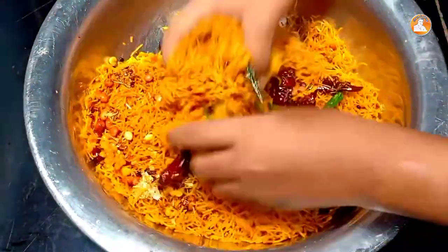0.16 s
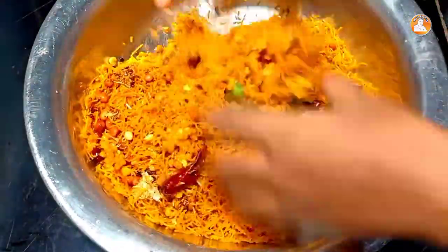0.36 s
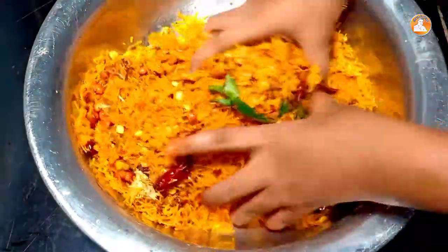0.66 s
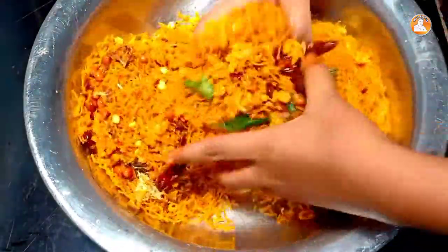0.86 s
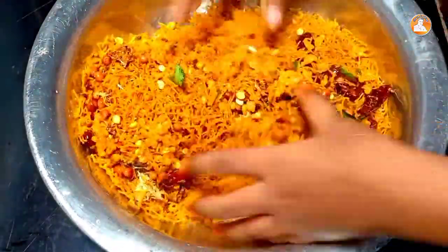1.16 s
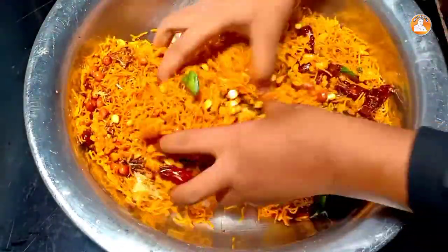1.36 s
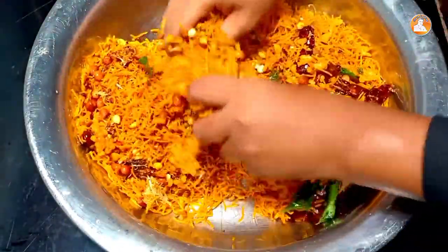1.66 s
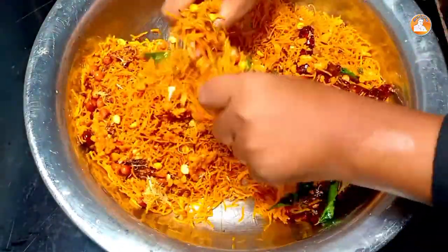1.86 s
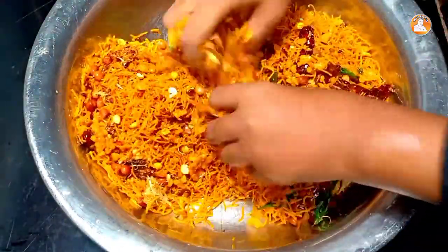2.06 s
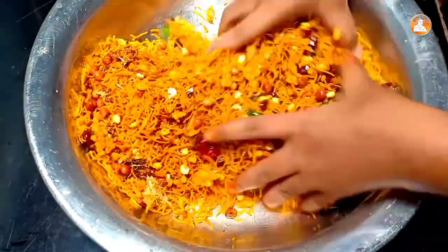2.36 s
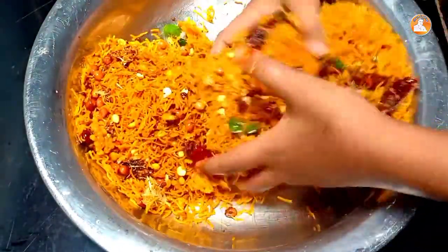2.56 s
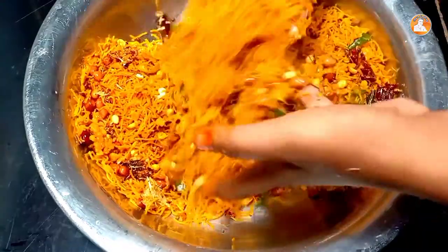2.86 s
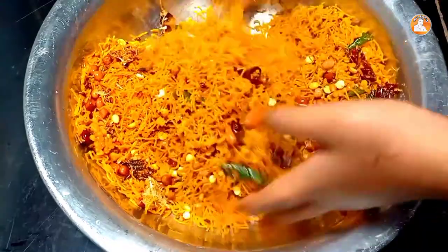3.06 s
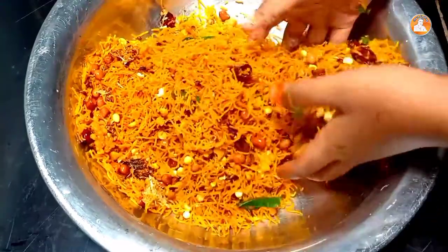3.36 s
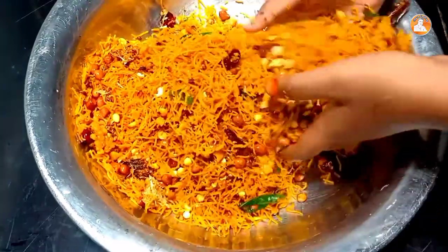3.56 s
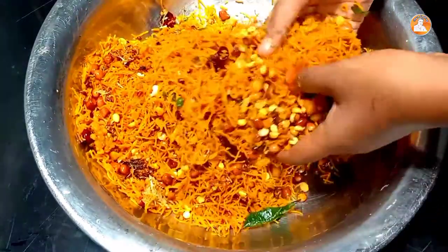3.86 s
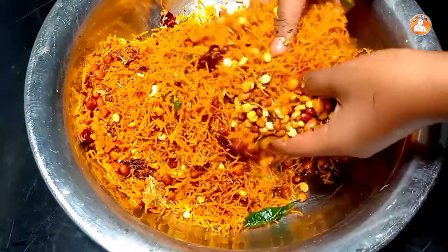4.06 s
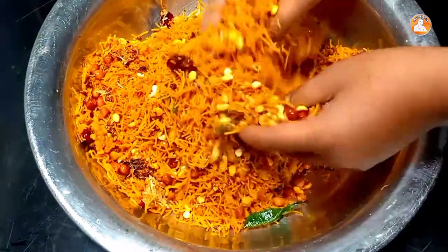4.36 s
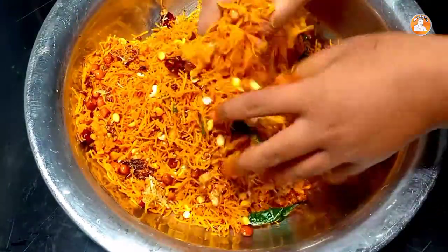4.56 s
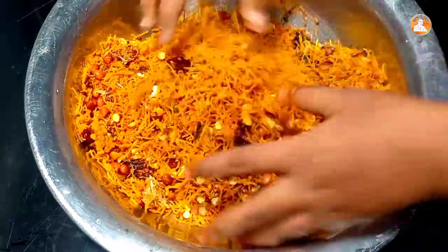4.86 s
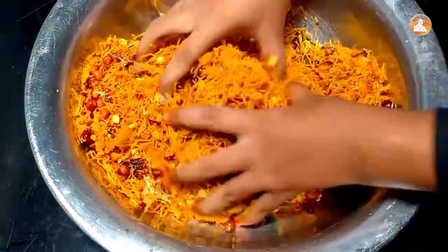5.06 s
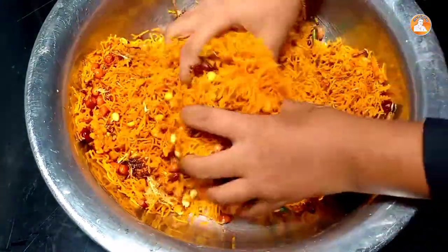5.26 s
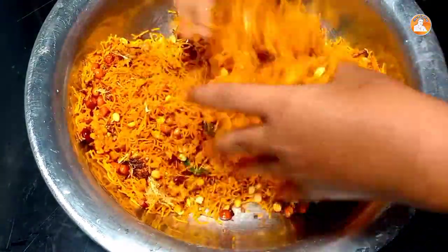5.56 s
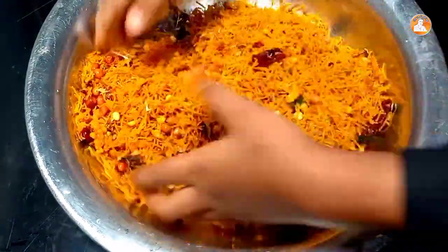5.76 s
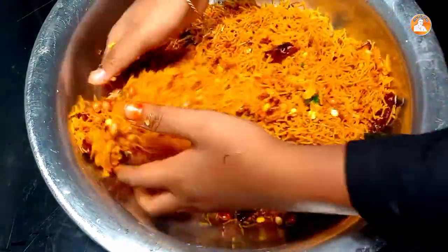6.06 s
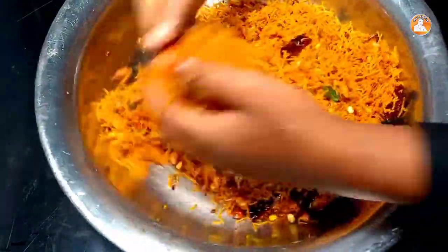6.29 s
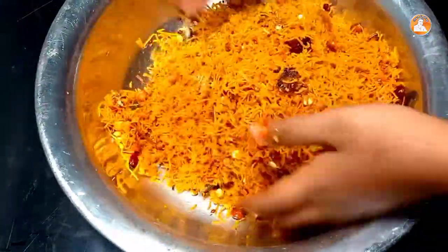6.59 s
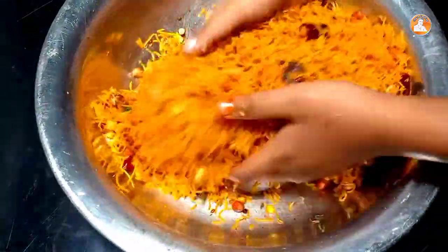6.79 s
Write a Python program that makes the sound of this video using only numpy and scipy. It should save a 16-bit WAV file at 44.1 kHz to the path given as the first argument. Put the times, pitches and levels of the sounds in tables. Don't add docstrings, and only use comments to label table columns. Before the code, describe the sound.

Close-up crunchy rustle of crisp snack pieces being stirred by hand in a metal bowl, with sharp snaps, soft thuds and a late clang.

```python
import sys
import numpy as np
from scipy import signal
from scipy.fft import rfft, irfft, next_fast_len
from scipy.io import wavfile
from scipy.ndimage import uniform_filter1d

SR = 44100
rng = np.random.default_rng(int(sys.argv[2]) if len(sys.argv) > 2 else 0)


def file_out(sig):
    cols = np.atleast_2d(sig).T
    lim = np.clip(cols, -1, 1)
    pcm = np.round(lim * 32767).astype(np.int16)
    wavfile.write(sys.argv[1], SR, pcm)


def nominal_scale(level):
    x = np.asarray(level, float) / 20
    return 10 ** x


N = 305613

# frequency in Hz, level in dB per Hz
CRUNCH = [(710, -26.5), (1200, -23), (1350, -21), (1570, -15), (1950, -6.5), (2330, -3), (2570, -1.5),
          (3450, -5.5), (3970, -1.5), (4950, -5), (6030, -6), (8500, -15), (11000, -28), (18700, -120)]
# frequency in Hz, level in dB per Hz
FIZZ = [(4120, -31.5), (7000, 11), (7910, -9.5), (9670, -2), (11400, -3), (12500, -3), (13700, -5.5),
        (15100, 1), (15800, -83.5)]


def evened(x):
    return x / np.sqrt(np.mean(x ** 2) + 1e-20)


def read(points, hz):
    f, value = np.transpose(points)
    return np.interp(np.log(hz + 1), np.log(f + 1), value)


def colour(x, points, size=4096, tilt=0.87):
    hz = abs(np.fft.fftfreq(size, 1 / SR))
    log_gain = np.log(nominal_scale(np.maximum(tilt * read(points, hz), -100)))
    taps = np.fft.ifft(np.exp(np.conj(signal.hilbert(log_gain)))).real
    return signal.oaconvolve(x, taps[None], axes=1)[:, :x.shape[1]]


def whiten(x, size=700):
    z = rfft(x, next_fast_len(N // 2 + 1) * 2)
    return irfft(z / np.sqrt(uniform_filter1d(abs(z) ** 2, size) + 1e-12))[:, :N]


def swells(rows, rest_db, column=1):
    edge_db, bend = -17.5, 1.113
    t = np.arange(N // 64 + 1) * 64 / SR
    power = nominal_scale(2 * rest_db) + 0 * t
    for row in rows:
        peak_s, rise_s, fall_s = row[0], row[2], row[3]
        late = (t - peak_s) / np.where(t < peak_s, -rise_s, fall_s)
        power = power + nominal_scale(2 * (row[column] + edge_db * late ** bend))
    return np.interp(np.arange(N) / SR, t, 10 * np.log10(power))


def scatter(t60, direct):
    t = np.arange(1500) / SR
    tail = rng.standard_normal((2, len(t))) * nominal_scale(-60 * t / t60)
    tail /= np.linalg.norm(tail, axis=1, keepdims=True)
    tail[[0, 1], rng.integers(0, 12, 2)] += direct
    return tail


def ring(drive, modes):
    t = np.arange(SR // 4) / SR
    tone = np.zeros((2, len(t)))
    for hz, db, t60 in modes:
        decay = nominal_scale(db - 60 * t / min(t60, .25))
        tone += decay * np.sin(2 * np.pi * hz * t + 6 * rng.random((2, 1)))
    return signal.oaconvolve(drive, tone, axes=1)


def piece(lo_hz, hi_hz):
    cycles, share = 6.3, .45
    hz, t = lo_hz * (hi_hz / lo_hz) ** rng.random(), np.arange(400) / SR
    tone = np.sin(2 * np.pi * hz * t) * np.exp(-t * hz / cycles)
    tone *= share * np.sqrt(hz / lo_hz) / np.linalg.norm(tone) / np.sqrt(cycles)
    tone[0] += .25
    return tone[None]


def ticks(per_s, spread_db, t60, clump_db, lo_hz, hi_hz, count):
    drift = rng.standard_normal((count + 1, N // 64 + 1))
    drift = evened(uniform_filter1d(uniform_filter1d(drift, 14), 9))
    clumps = nominal_scale(clump_db * (drift[:1] + drift[1:]))
    clumps = np.repeat(clumps, 64, axis=1)[:, :N]
    happens = rng.random(N) < per_s / SR
    size = nominal_scale(spread_db * np.minimum(rng.exponential(1, N), 3.4)) * happens
    kind = rng.integers(0, count, N)
    total = np.zeros((2, N))
    for k in range(count):
        shape = signal.oaconvolve(scatter(t60, 0.5), piece(lo_hz, hi_hz), axes=1)
        hits = size * (kind == k) * clumps[k]
        total += signal.oaconvolve(hits[None], shape, axes=1)[:, :N]
    return evened(whiten(total))


def slips():
    per_s, decay_s, share = 70, 0.0043, 0.21
    start = np.minimum(rng.exponential(1, N), 2) * (rng.random(N) < per_s / SR)
    slides = signal.lfilter([1], [1, -np.exp(-1 / (decay_s * SR))], start)
    return evened(1 + share * slides)


def heap():
    # peak in seconds, crunch level in dB, rise and fall in seconds
    sweeps = [(.12, -27, 0.46, 0.31), (.28, -22.5, 0.2, 0.4), (.45, -27, 0.1, 0.15),
              (.78, -24.5, 0.14, 0.24), (.98, -21, 0.4, 0.45), (1.17, -26, 0.21, 0.046),
              (1.56, -19.5, 0.2, 0.4), (1.8, -25.5, 0.19, 0.6), (2.05, -29, 0.3, 1),
              (2.32, -29.5, 0.28, 0.26), (2.69, -22, 0.015, 0.34), (2.8, -19.5, 0.093, 0.17),
              (3.02, -26, 0.67, 1), (3.26, -27, 0.13, 0.43), (3.51, -22.5, 0.19, 0.26),
              (3.68, -20, 0.37, 0.068), (3.9, -25.5, .2, 0.48), (4.1, -27, 0.1, 0.21),
              (4.47, -63, 0.071, 0.1), (4.7, -24, 0.044, 0.064), (4.58, -42, 0.09, 0.12),
              (4.95, -27.5, 0.66, 0.8), (5.15, -28.5, 0.096, 0.2), (5.3, -25, 0.099, 0.76),
              (5.56, -22, 0.37, 0.99), (5.97, -22, 0.061, 0.32), (6.1, -20.5, 0.05, 0.089),
              (6.28, -17, 0.19, 0.12), (6.52, -19, 0.41, 0.78), (6.8, -25.5, 0.21, 0.44)]
    # peak in seconds, level in dB, rise and fall in seconds
    drops = [(.27, -24, 0.081, 0.13), (.44, -32, 0.054, 0.27), (1.0, -21.5, 0.12, 0.23),
             (1.15, -24.5, 0.11, 0.093), (1.537, -17, .02, 0.023), (1.572, -14.5, 0.026, 0.018),
             (1.608, -25, 0.012, 0.022), (1.652, -17, 0.017, .08), (1.826, -18.5, .025, .02),
             (2.787, -17, .008, 0.046), (3.487, -19, .008, 0.024), (3.997, -23, .015, 0.024),
             (5.447, -23, .02, 0.017), (1.55, -30, 0.1, 0.12), (1.7, -20.5, 0.092, 0.071),
             (1.82, -19.5, 0.11, 0.093), (2.71, -37, 0.29, 0.19), (2.81, -22, 0.12, 0.25),
             (3.28, -25.5, 0.23, 0.12), (3.5, -23.5, 0.091, 0.17), (3.95, -33.5, 0.47, 0.2),
             (4.7, -48, 0.047, 0.062), (5.57, -25.5, 0.21, 0.29), (6.08, -31, 0.054, 0.041),
             (6.29, -21.5, 0.049, 0.29), (6.53, -26, 0.26, 0.19), (6.85, -31.5, 0.36, 0.13)]
    # peak in seconds, level in dB, rise and fall in seconds
    sifts = [(.19, -33, 0.14, 0.1), (.9, -24.5, 0.054, 0.13), (1.55, -26.5, 0.12, 0.16),
             (1.75, -31.5, .1, 0.34), (2.03, -30.5, 0.25, 0.25), (2.3, -32, 0.19, 0.34),
             (3.51, -31, 0.1, 0.14), (3.66, -29.5, .1, 0.065), (4.17, -52, 0.091, 0.11),
             (5.15, -42.5, 0.37, .3), (5.97, -28.5, .15, 0.35), (6.28, -28.5, 0.29, 0.11),
             (6.75, -34, .2, 0.28)]
    # peak in seconds, level in dB, rise and fall in seconds
    rattles = [(.3, -30, 0.063, 0.28), (.46, -28, .1, 0.046), (.77, -34, 0.031, .1), (.98, -37, .1, 0.13),
               (1.55, -42, 0.12, 0.11), (2.75, -34, 0.074, .15), (3.52, -30, 0.066, 0.12),
               (4.11, -37, .05, .06), (4.66, -30, 0.061, 0.027), (5.53, -37, 0.11, 0.13),
               (5.83, -36, 0.017, 0.079), (6.25, -36, .08, .1), (6.515, -16, .03, .04)]
    # frequency in Hz, level in dB, t60 in seconds
    steel = [(743, -5, .09), (991, -1, .09), (1103, -5, .1), (1610, -3, .1), (2206, 0, .08), (3190, 0, .08),
             (3456, 0, .1), (3902, 0, .05), (4559, -2, .1), (5270, -4, .05)]
    # frequency in Hz, level in dB per Hz
    hollows = [(1500, -34), (2150, -9.5), (2600, -2), (2950, -7.5), (4200, -37.5)]
    # frequency in Hz, level in dB per Hz
    rattle_tone = [(2800, -38), (3600, 11), (3920, 3), (4400, -5), (5600, -35)]

    drive = slips() * ticks(1500, spread_db=0.0, t60=.03, clump_db=1.5, lo_hz=1736, hi_hz=14820, count=24)
    crumbs = rng.standard_normal((2, N))
    sweep_db = swells(sweeps, rest_db=-47)
    crunch = evened(colour(drive + 0.39 * crumbs, CRUNCH))
    crunch += nominal_scale(-15.5) * evened(ring(drive, steel)[:, :N])
    hollow = evened(colour(drive, hollows)) * nominal_scale(swells(drops, rest_db=-49.5))
    fine = np.hypot(nominal_scale(-38 + sweep_db + 27.5), nominal_scale(swells(sifts, rest_db=-67)))
    fizz = evened(colour(drive + 1.3 * crumbs, FIZZ)) * fine
    rattle = evened(colour(drive, rattle_tone)) * nominal_scale(swells(rattles, rest_db=-57))
    return nominal_scale(sweep_db) * crunch + hollow + fizz + rattle


def bowl():
    # peak in seconds, drag in dB, rise and fall in seconds, rocking in dB
    shoves = [(.1, -36, 0.3, 0.24, -49), (.26, -29, 0.094, 0.16, -31.5), (.44, -28.5, 0.21, 0.12, -33.5),
              (.58, -46, 0.16, 0.057, -37.5), (.79, -34, 0.099, 0.068, -41), (.99, -29.5, 0.14, 0.31, -34),
              (1.15, -33, 0.44, 0.12, -75), (1.55, -38.5, 0.37, 0.037, -53), (1.83, -23, 0.17, 0.15, -26.5),
              (2.32, -38.5, 0.21, 0.21, -49), (2.72, -32, 0.049, 0.25, -40), (2.86, -30, 0.13, 0.37, -41.5),
              (3.57, -38, 0.17, 0.3, -37.5), (3.67, -33, 0.092, 0.069, -43),
              (3.88, -37.5, 0.053, 0.13, -61), (4.72, -41, 0.023, 0.089, -57), (5.3, -37, 0.35, 0.06, -45),
              (5.54, -24.5, 0.16, 0.26, -28.5), (6.25, -28.5, 0.1, 0.23, -27), (6.42, -41, .2, 0.14, -33.5),
              (6.51, -25.5, 0.078, 0.21, -46), (6.64, -32.5, 0.07, 0.17, -58)]
    # frequency in Hz, level in dB per Hz
    drag_tone = [(94, -12), (160, -20), (177, -11), (305, -8), (577, -7.5), (716, -2), (863, 0), (975, 5.5),
                 (1330, -12.5), (1500, -1.5), (1950, -21), (3300, -120)]
    # frequency in Hz, level in dB per Hz
    rock_tone = [(15, -46), (25, -9), (27, -37), (38, -103), (65, -7), (86, 2.5), (141, -6.5), (172, -18.5),
                 (190, -65), (250, -36), (420, -120)]

    drive = ticks(1200, spread_db=-0.5, t60=0.05, clump_db=2.0, lo_hz=187.7, hi_hz=1024, count=12)
    drag = evened(colour(drive + 0.35 * drive[::-1], drag_tone))
    push = rng.standard_normal((2, N))
    rock = evened(colour(push[:1] + 0.073 * push, rock_tone, size=8192))
    drag_db = swells(shoves, rest_db=-51) - 2.0
    rock_db = swells(shoves, rest_db=-52, column=4) - 3.5
    return drag * nominal_scale(drag_db) + rock * nominal_scale(rock_db)


def place(mix, s, sound, db, pan_db):
    at = round(s * SR)
    side_db = np.array([[.5], [-.5]]) * np.clip(pan_db, -8, 8)
    sound = sound / abs(sound).max(axis=1, keepdims=True) * nominal_scale(db + side_db)
    sound = sound[:, :N - at]
    mix[:, at:at + sound.shape[1]] += sound


def snaps():
    # start in seconds, peak in dB, pitch in Hz
    nuts = [(0.8125, -16.5, 2200), (0.8626, -13, 2610), (0.9377, -11, 2250), (0.995, -13, 2530),
            (1.606, -8, 2480), (1.6442, -10, 2450), (1.8179, -10, 2640), (2.155, -16, 2280),
            (2.595, -17.5, 2580), (2.61, -15.5, 2500), (2.672, -8.5, 2620), (2.6957, -9, 2500),
            (2.782, -4, 2280), (2.8788, -13, 2740), (2.8882, -14, 2440), (3.054, -11.5, 2370),
            (3.173, -19, 2570), (3.211, -14.5, 2800), (3.2276, -6, 2570), (3.2808, 0, 2430),
            (3.3173, -18, 2640), (3.3857, -19, 2450), (3.4672, -13.5, 2680), (3.483, -4, 2290),
            (3.7034, -16, 2680), (3.7523, -10, 2700), (3.8266, -3, 2630), (3.889, -11, 2630),
            (3.9924, -12, 2570), (4.0621, -1, 2600), (4.1129, -13, 2620), (4.187, -19, 2600),
            (4.2262, -16, 2630), (4.2577, -25, 2750), (4.3261, -30, 2670), (4.39, -14.5, 2560),
            (4.4734, -27, 2320), (4.7233, -13.5, 2570), (5.0466, -15, 2260), (5.3622, -16, 2200),
            (5.3887, -14.5, 2810), (5.44, -15, 2650), (5.543, -15, 2680), (5.6769, -16, 2430),
            (5.695, -6, 2620), (5.772, -15, 2500), (5.9698, -32, 2680), (6.0633, -10.5, 2440),
            (6.2725, -11, 2240)]
    # start in seconds, peak in dB, pitch in Hz
    crumbs = [(0.1384, -23, 4220), (0.1974, -12, 5530), (0.2436, -20, 3890), (0.3563, -15, 3900),
              (0.447, -15.5, 3910), (0.6679, -18, 4690), (0.6938, -22, 3900), (0.7616, -14, 3820),
              (1.0735, -12, 3630), (2.2575, -19, 4850), (2.641, -18.5, 4200), (2.7451, -13, 3870),
              (3.411, -12.5, 5350), (3.6106, -16, 3900), (3.7778, -32, 3320), (3.7778, -18, 4190),
              (4.106, -18, 3920), (4.5364, -25, 3560), (4.6898, -10.5, 6180), (5.1692, -26, 4030),
              (5.214, -18, 4030), (5.415, -10, 4690), (5.5173, -18, 3620), (5.5302, -9, 3890),
              (6.056, -12, 3660), (6.785, -16, 5530), (6.9011, -18, 3800)]
    # start in seconds, peak in dB, pitch in Hz
    sticks = [(0.0084, -12.5, 2100), (0.8358, -7.5, 2230), (1.5347, -6.5, 2380), (1.5672, 1, 2550),
              (3.1085, -9.5, 3020), (3.2645, -12, 2600), (3.8366, -16, 2630), (3.5084, -5, 2250),
              (3.5175, -5.5, 2310), (3.5283, -14, 2560), (3.853, -1.5, 2670), (4.1565, -10.5, 2600),
              (4.68, -16.5, 2650), (6.0186, -18, 2750), (6.771, -9, 2500), (6.821, -11, 2650),
              (6.8391, -8.5, 2580), (6.877, -9.5, 2700)]
    # start in seconds, peak in dB, pitch in Hz, brightness in dB
    chips = [(0.1695, -8, 6000, 1), (0.1918, -9, 5700, -8), (0.349, -6.5, 3730, -28),
             (0.4621, -5.5, 4030, -28), (0.6319, -8, 4140, -19.5), (0.9236, -12, 3820, -20),
             (2.0365, -7, 5570, -7), (2.3074, -16.5, 5160, -17), (4.874, -13, 4260, -27),
             (4.955, -26, 4240, -46), (5.0936, -10.5, 4230, -29.5), (5.1184, -7, 5100, -18),
             (5.2749, -14, 4150, -9), (5.657, -9.5, 4180, -16), (5.883, -18, 3640, -63),
             (5.9474, -8, 6200, -23), (6.0961, -0.5, 5600, -10)]

    events = list(chips)
    for rows, bright_db in [(nuts, -29), (crumbs, -20), (sticks, -19)]:
        events += [(*row, bright_db) for row in rows]
    out, t = np.zeros((2, N)), np.arange(300) / SR
    for s, db, hz, bright_db in events:
        paths = scatter(.014, 2.2) + .25 * scatter(.06, 0)
        paths = paths + .6 * paths[::-1]
        cycles = np.sin(2 * np.pi * hz * t) * np.exp(-t * hz ** 2 / 16000)
        body = np.diff(cycles, 2)
        low = signal.oaconvolve(paths, body[None], axes=1)[:, :1500]
        wide = colour(paths, CRUNCH, size=512)
        high = colour(paths, FIZZ, size=512)
        sound = evened(low) + 0.31 * evened(wide) + nominal_scale(bright_db + 10.5) * evened(high)
        place(out, s, sound, db, -7.0)
    return signal.sosfilt(signal.butter(3, 1850, "high", fs=SR, output="sos"), out)


def strikes(rows, modes, crash):
    out, t = np.zeros((2, N)), np.arange(4000) / SR
    for s, db, length, pan_db in rows:
        burst = rng.standard_normal((2, len(t))) * np.exp(-t / min(length, .05))
        tone = ring(burst * np.exp(-t / 0.0019), modes)[:, :len(t)]
        noise = evened(colour(burst, CRUNCH)) + 0.39 * evened(colour(burst, FIZZ))
        place(out, s, evened(tone) + crash * noise, db - .1, pan_db - 0.5)
    return out


def slams():
    # start in seconds, peak in dB, length in seconds, left-right difference in dB
    slam = [
        (6.487, -1.5, 0.031, 0.5),
        (6.499, 2, 0.052, 2),
        (6.51, 0, 0.03, 1),
        (6.557, -12, 0.017, 9),
    ]
    # start in seconds, peak in dB, length in seconds, left-right difference in dB
    clang = [
        (6.613, 0.0042, 0.04, -12.5),
    ]
    # frequency in Hz, level in dB, t60 in seconds
    slam_modes = [(760, -10, 0.18), (1020, -17, 0.14), (1610, -22, 0.14), (2195, -2, 0.15),
                  (2897, -5, 0.085), (2940, 6.5, 0.036), (3450, -10, 0.13), (4240, -10, 0.087),
                  (4760, -10, .1)]
    # frequency in Hz, level in dB, t60 in seconds
    clang_modes = [(1113, -7, 0.4), (1640, -4.5, 0.45), (3330, -0.5, 0.26), (3400, 5.5, 0.13),
                   (4490, 6, 0.092), (4450, -3, 0.085), (5320, 4, 0.074), (6010, -1.5, 0.067)]
    return strikes(slam, slam_modes, crash=0.86) + strikes(clang, clang_modes, crash=0.67)


def knocks():
    # start in seconds, peak in dB, pitch in Hz, t60 in seconds
    rows = [
        (0.009, -21, 955, 0.022),
        (2.307, -28, 897, 0.034),
        (3.064, -19, 973, 0.041),
        (3.23, -25, 1027, 0.054),
        (3.659, -31, 990, 0.048),
        (3.87, -22, 555, 0.032),
        (4.569, -37, 585, 0.04),
        (5.536, -23, 693, 0.22),
    ]
    out, t = np.zeros((2, N)), np.arange(3000) / SR
    for s, db, hz, t60 in rows:
        note = np.sin(2 * np.pi * hz * t) + 0.39 * np.sin(2 * np.pi * 1.3 * hz * t)
        note *= (1 - np.exp(-t / 0.00015)) * nominal_scale(-60 * t / min(t60, .2))
        paths = scatter(0.036, 1) + scatter(0.042, 1)[:1]
        place(out, s, signal.oaconvolve(paths, note[None], axes=1), db, -2.0)
    return out


def sings():
    # middle in seconds, length in seconds, level in dB, frequency in Hz, glide in Hz
    slides = [(5.29, .17, -30, 4210, -70), (5.285, .07, -29, 3190, 30), (5.35, .08, -31, 2280, 40),
              (5.325, .13, -33, 750, 20), (5.36, .04, -33, 1900, 0), (5.3, .08, -34, 2750, 60),
              (6.44, .09, -30, 4560, 0), (6.3, .08, -25, 2300, 30), (6.3, .07, -28, 3230, 0),
              (3.985, .04, -29, 3200, 0), (5.975, .06, -30, 5950, 100), (4.357, .03, -38, 3850, 0),
              (4.45, .04, -39, 3900, 0), (2.995, .03, -36, 1600, 0), (3.157, .025, -36, 1620, 0),
              (6.53, .07, -21, 2200, 0), (3.11, .09, -40, 990, 0)]
    width_hz = 40
    r = np.exp(-np.pi * width_hz / SR)
    out, t = np.zeros((2, N)), np.arange(8820) / SR - .1
    for mid, length, db, hz, glide_hz in slides:
        turn = np.exp(2j * np.pi * (hz * t + glide_hz * t ** 2 / length))
        noise = rng.standard_normal((2, len(t))) + 1j * rng.standard_normal((2, len(t)))
        wobble = signal.lfilter([1], [1, -r], noise)
        at = round((mid - .1) * SR)
        out[:, at:at + len(t)] += evened((wobble * turn).real) * nominal_scale(db - 100 * (t / length) ** 4)
    return out


def kitchen():
    # frequency in Hz, level in dB per Hz
    hush = [(18, -23), (30, -6), (48, -6), (102, -5), (341, -6.5), (996, -5.5), (1290, -26), (2550, 2),
            (6050, -5), (9680, -19), (15500, -5.5)]
    return nominal_scale(-41) * evened(colour(rng.standard_normal((2, N)), hush))


def scene():
    return heap() + bowl() + snaps() + slams() + knocks() + sings() + kitchen()


def ports(dry):
    # frequency in Hz, left-right difference in dB
    balance = [(60, -2.5), (110, -2.5), (300, 0), (1500, 0), (2400, -6.5), (4400, -5.5), (9000, -1.5),
               (15000, 1)]
    left = colour(dry[:1], balance, size=1024, tilt=.5)
    right = colour(dry[1:], balance, size=1024, tilt=-.5)
    return np.vstack([left, right])


def starve(x):
    # frequency in Hz, silent share of the time from 0 to 1
    starved = [(5800, 0), (6600, .01), (8000, .27), (9600, .57), (11500, .49), (13000, .4), (14500, .3),
               (15300, .6)]
    size, lead = 2048, 632
    hz, t, z = signal.stft(np.pad(x, ((0, 0), (lead, 0))), SR, "cosine", nperseg=size)
    band = np.arange(len(hz)) // 16
    luck = uniform_filter1d(rng.standard_normal((band[-1] + 1, len(t))), size=2)
    rank = luck.argsort(1).argsort(1) / len(t)
    level = abs(z.sum(0))
    peak = level > 2.1 * uniform_filter1d(level, size=16, axis=0)
    heard = peak | (rank[band] >= read(starved, hz)[:, None])
    kept = signal.istft(z * heard, SR, "cosine", nperseg=size)[1]
    return kept[:, lead:lead + N]


def band_limit(x):
    return signal.sosfilt(signal.butter(12, 15800, fs=SR, output="sos"), x)


def record(dry):
    low_cut = signal.butter(2, 35, "high", fs=SR, output="sos")
    offset = 0.003
    loud = np.clip(signal.sosfilt(low_cut, ports(dry)) + offset, -1, 1)
    return band_limit(starve(loud))


dry = scene()
out = record(dry)
file_out(out)
```